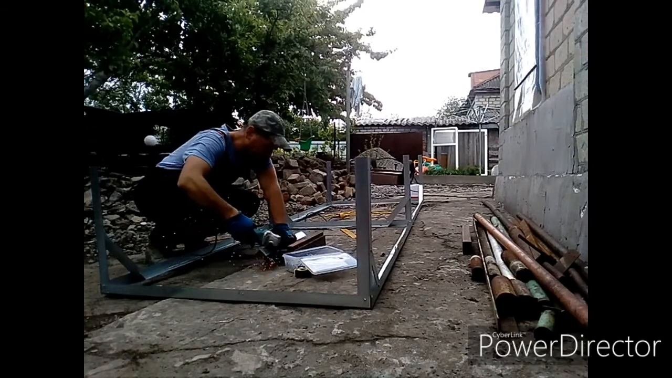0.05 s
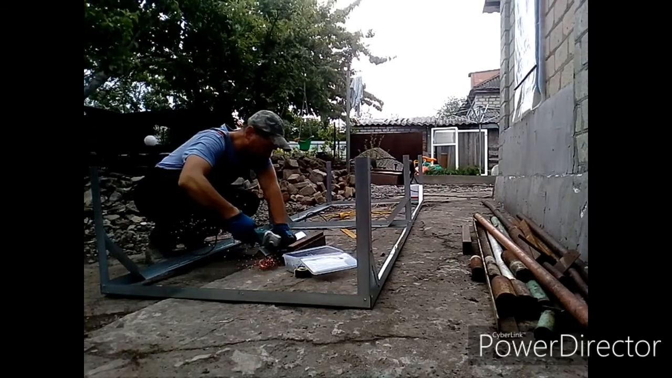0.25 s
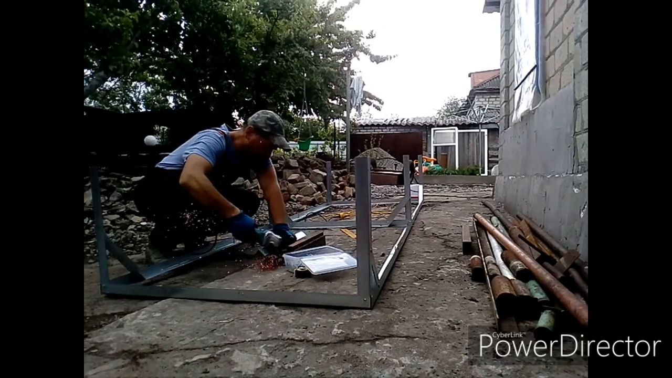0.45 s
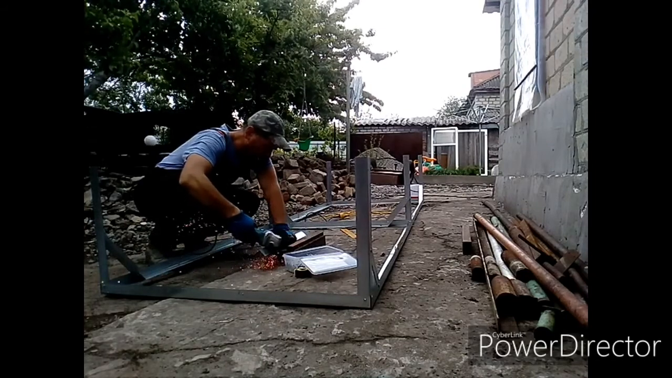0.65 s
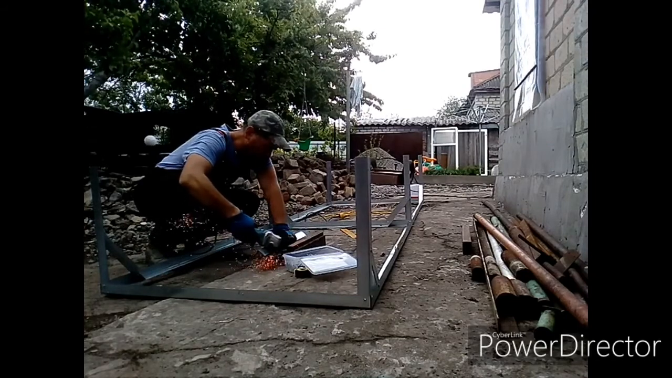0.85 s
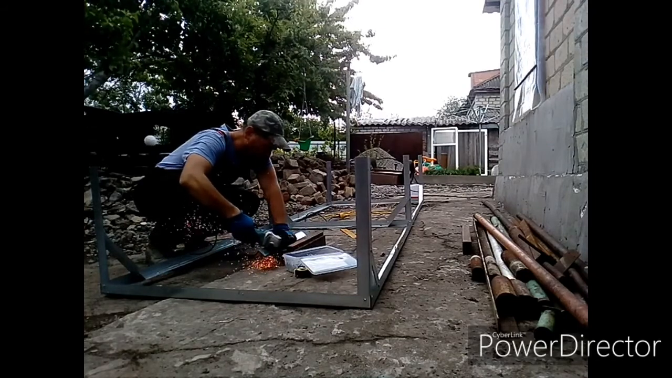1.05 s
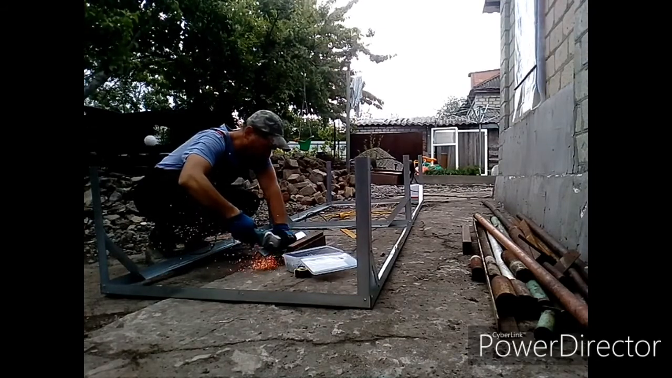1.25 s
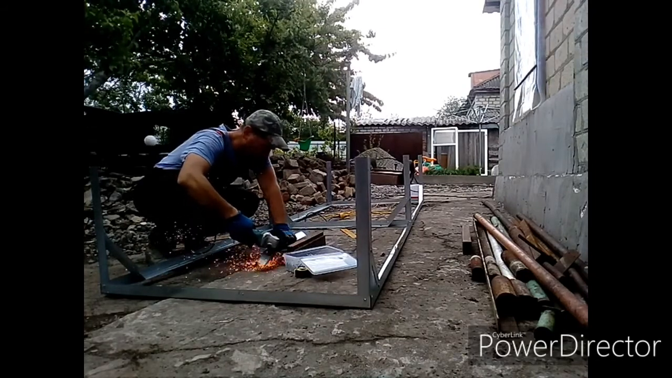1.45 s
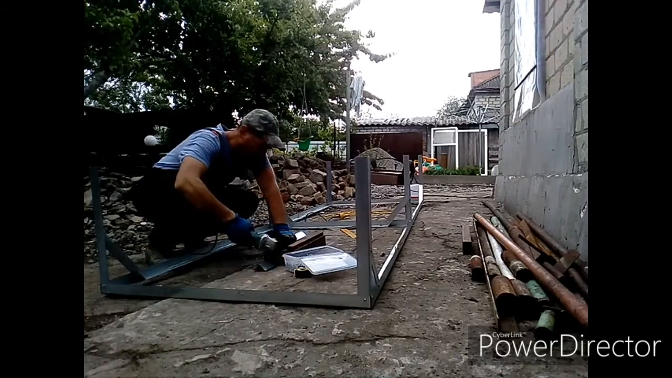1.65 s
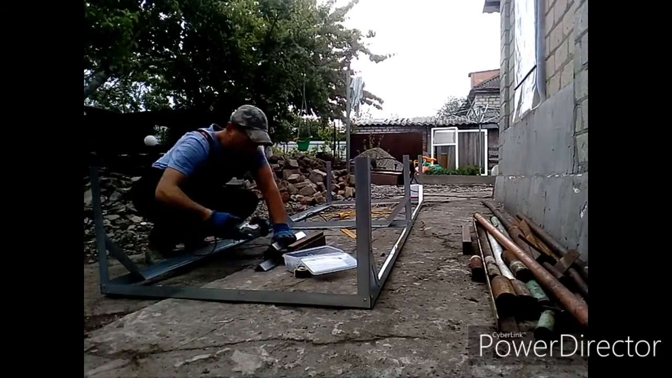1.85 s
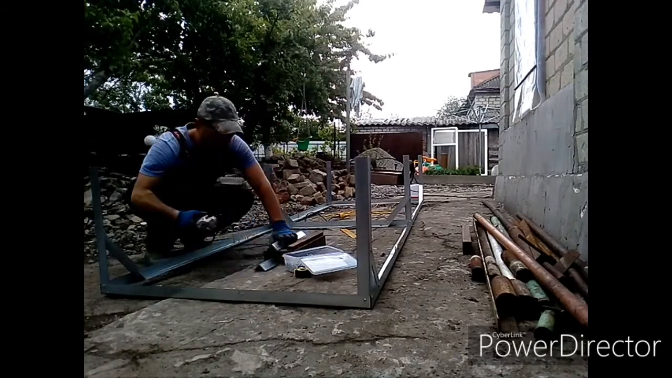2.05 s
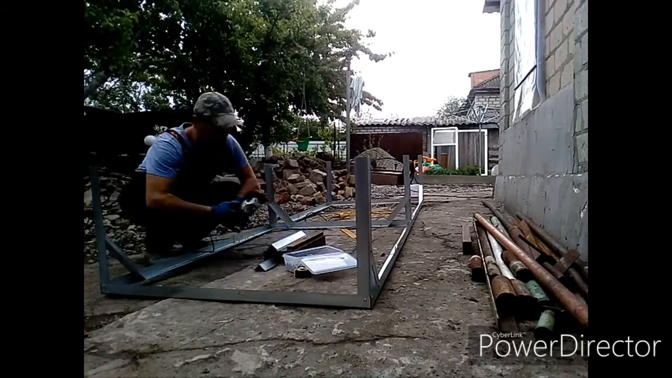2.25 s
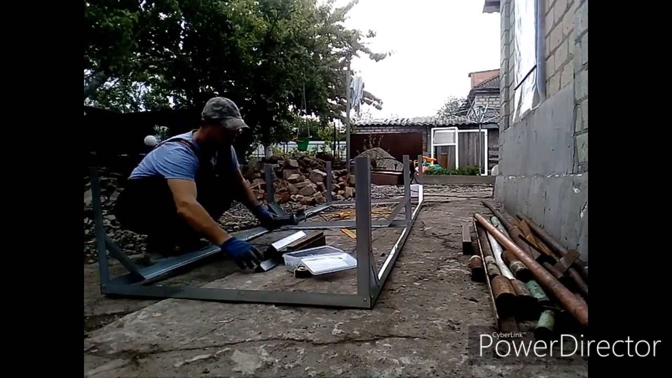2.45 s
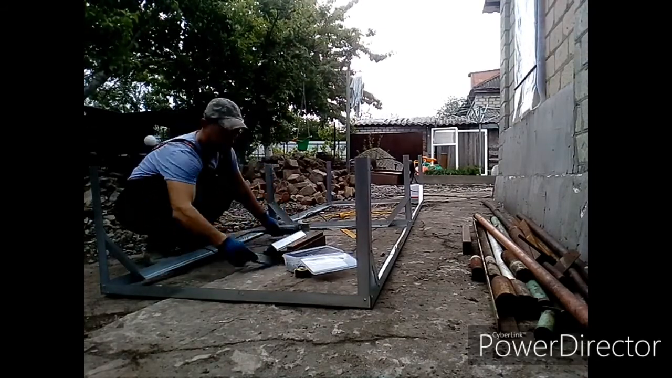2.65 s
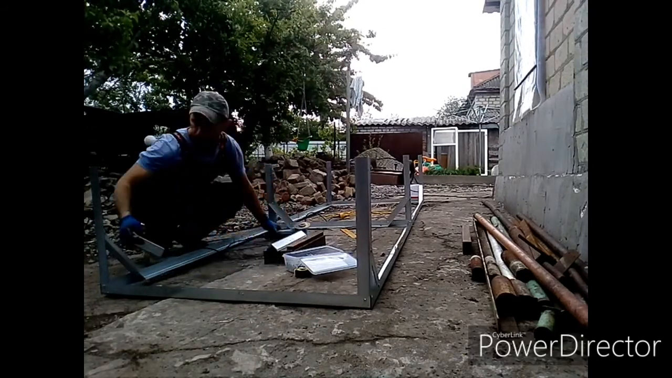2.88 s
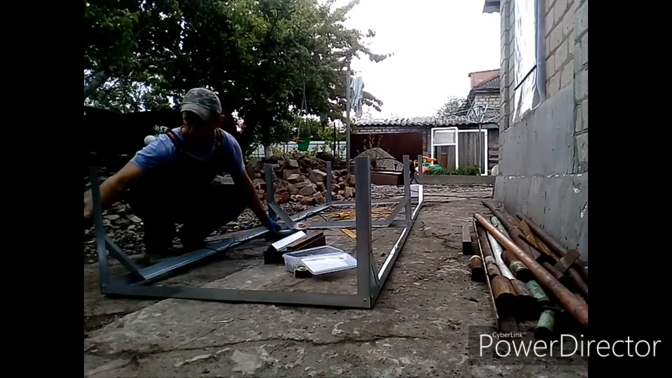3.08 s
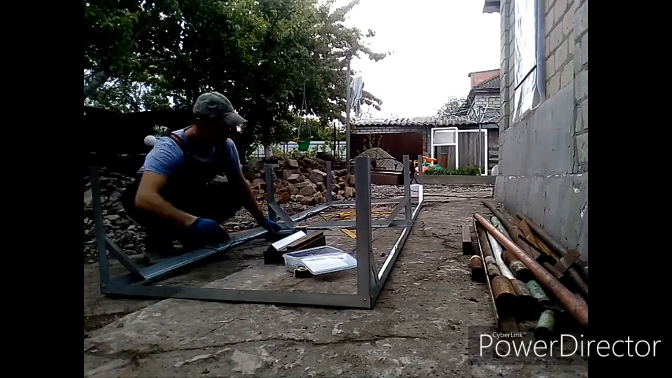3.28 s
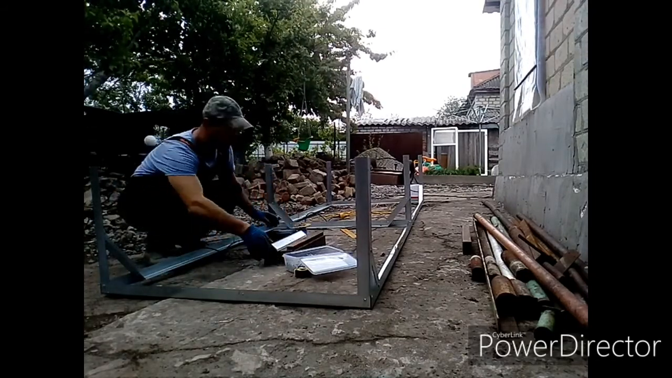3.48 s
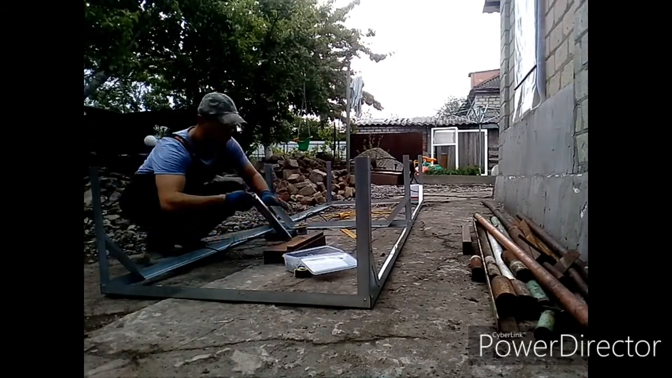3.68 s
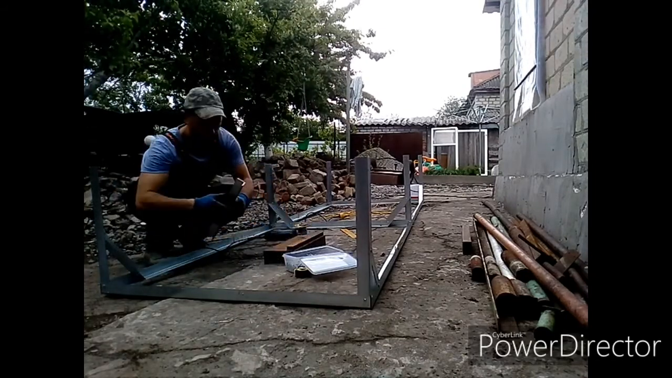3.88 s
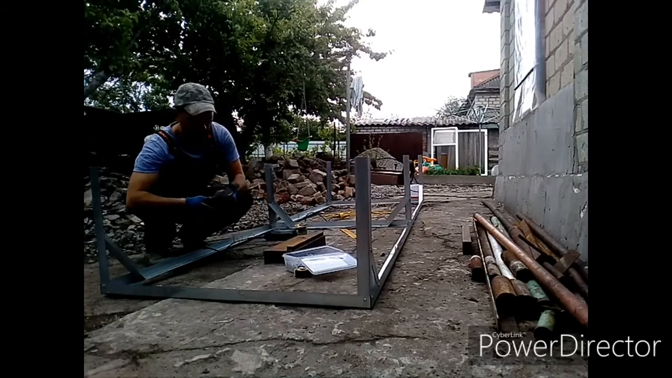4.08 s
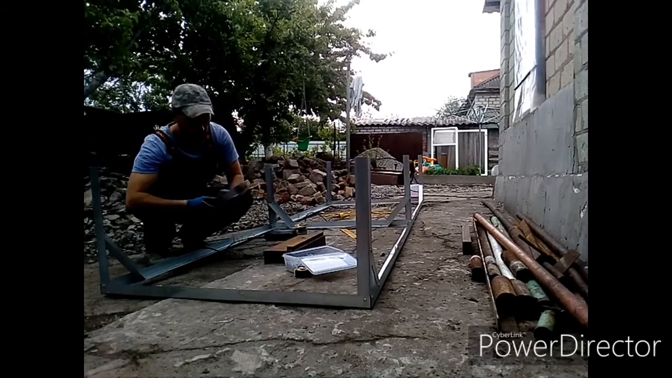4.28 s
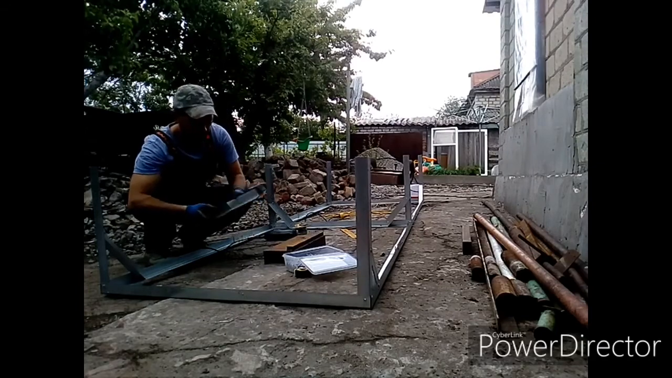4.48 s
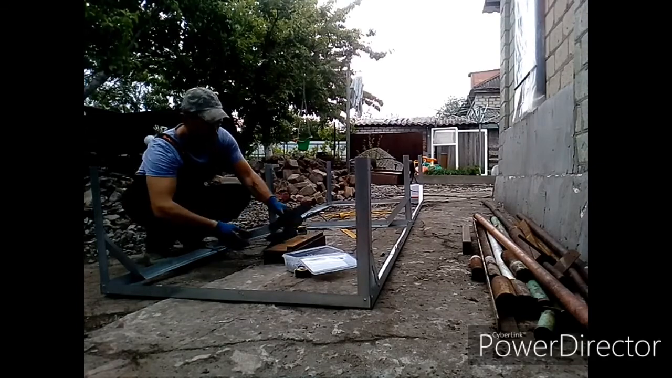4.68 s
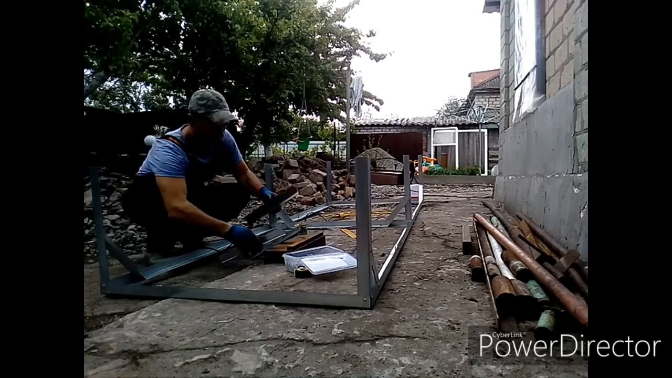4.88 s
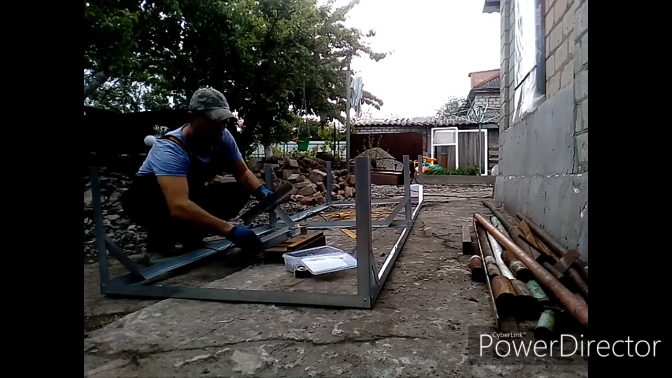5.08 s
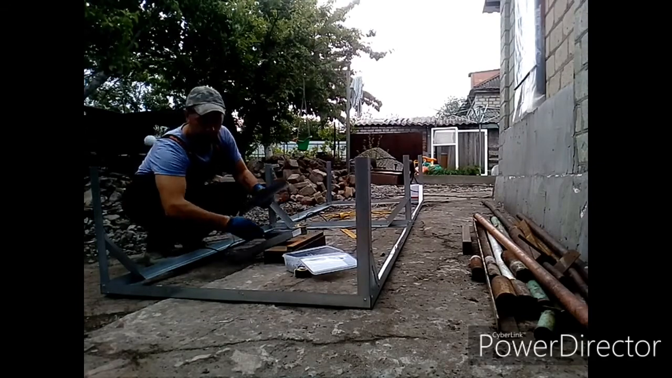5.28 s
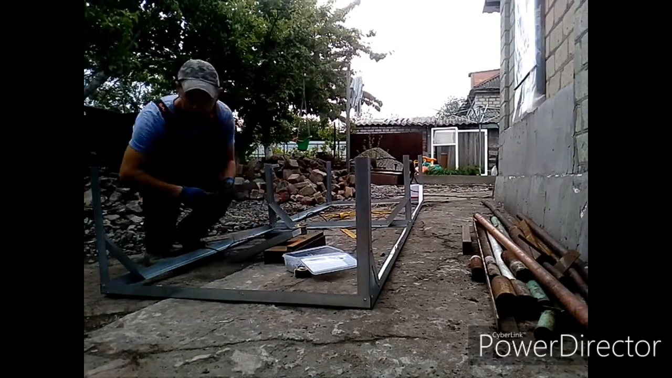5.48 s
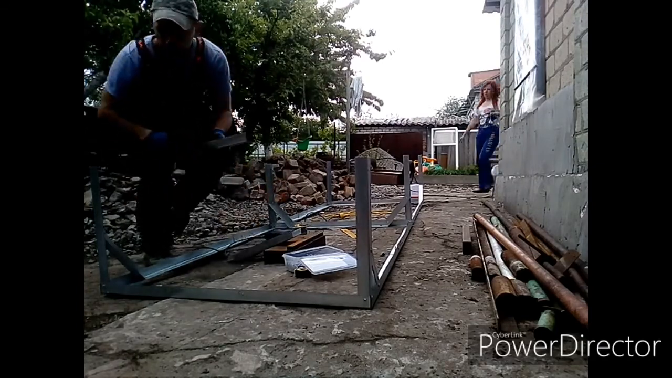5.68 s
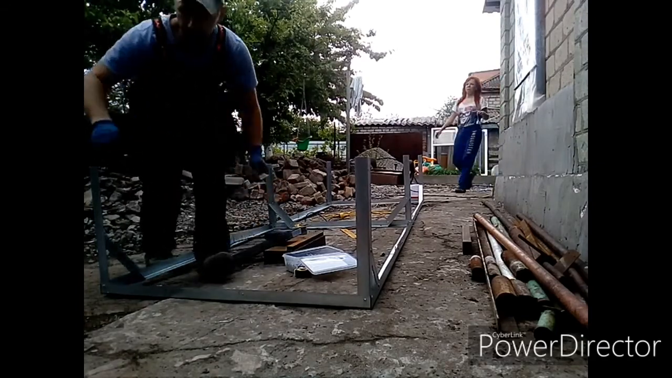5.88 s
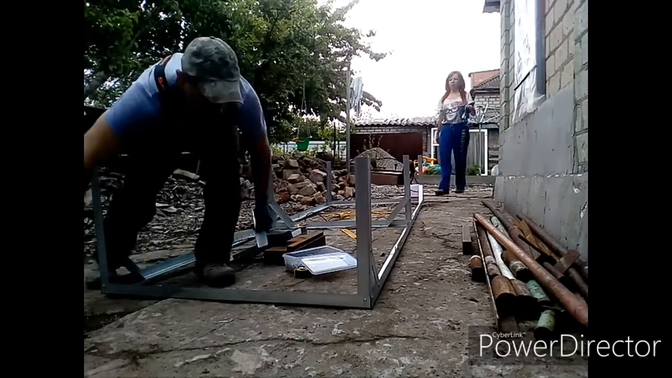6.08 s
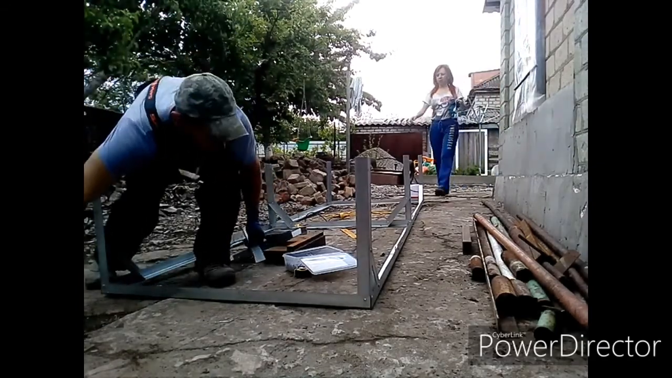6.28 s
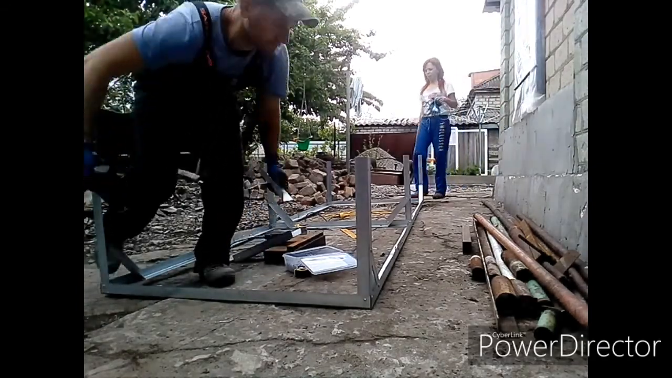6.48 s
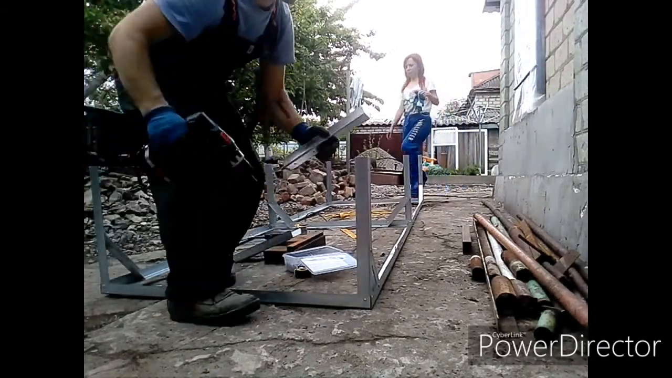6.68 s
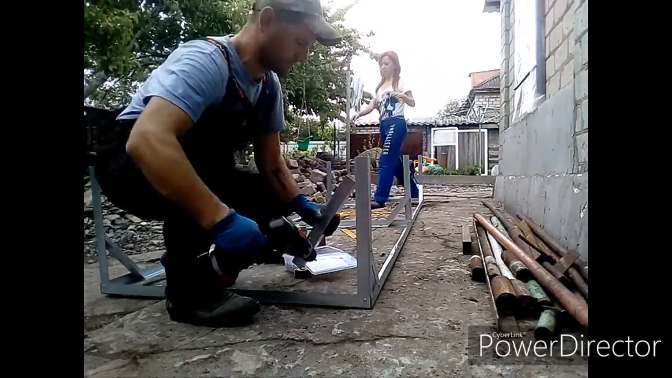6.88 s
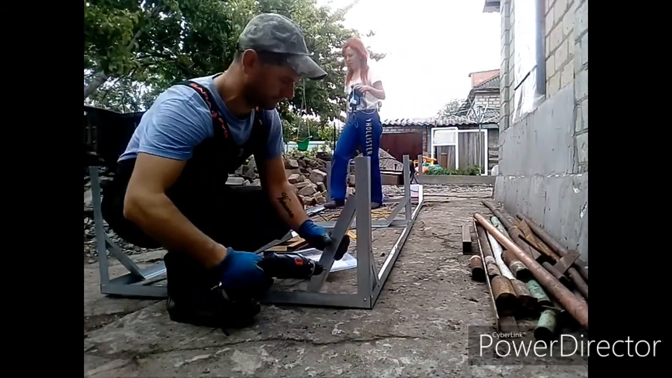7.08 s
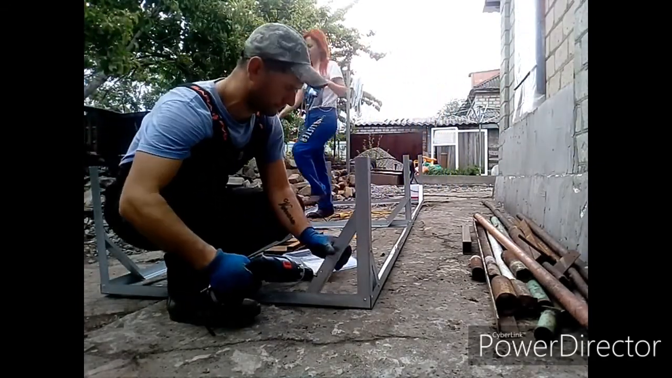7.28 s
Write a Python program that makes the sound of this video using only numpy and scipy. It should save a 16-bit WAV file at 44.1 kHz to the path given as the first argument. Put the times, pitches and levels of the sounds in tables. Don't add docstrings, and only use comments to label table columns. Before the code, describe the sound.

An angle grinder cuts steel, breaks free and races, then spins down and skids on concrete; afterwards a profile scrapes, rings, and boots scuff.

```python
import sys
import numpy as np
from scipy import signal
from scipy.fft import rfft, irfft
from scipy.io import wavfile

SR = 44100
rng = np.random.default_rng(int(sys.argv[2]) if len(sys.argv) > 2 else 0)


def store_pcm(level_fs):
    pcm = np.round(np.clip(level_fs, -1, 1) * 32767).astype(np.int16)
    wavfile.write(sys.argv[1], SR, np.atleast_2d(pcm).T)


def voltage_ratio(level):
    return 10 ** (np.asarray(level, float) / 20)


N = 323686
TIME = np.arange(N) / SR
HZ = np.arange(N // 2 + 1) * SR / N + 1e-3


def rms_one(x):
    return x / np.sqrt(np.mean(x ** 2) + 1e-20)


def column(rows, k):
    rows = np.array(rows)
    return np.interp(TIME, rows[:, 0], rows[:, k])


def at_hz(points):
    points = np.array(points)
    return np.interp(np.log(HZ), np.log(np.maximum(points[:, 0], 1)), points[:, 1])


def butter(x, order, hz, kind="low"):
    return signal.sosfilt(signal.butter(order, hz, kind, fs=SR, output="sos"), x)


def colour(x, spectrum, peaks=(), lift_db=0):
    power = 1
    for hz, width, db in peaks:
        power = power + voltage_ratio(db + lift_db) ** 2 / (1 + (2 * (HZ - hz) / width) ** 2)
    return rms_one(irfft(rfft(x) * voltage_ratio(at_hz(spectrum)) * np.sqrt(power), N))


def grit(spread_db, shape=N):
    size_db = spread_db * np.minimum(rng.standard_normal(shape), 2)
    return rng.standard_normal(shape) * voltage_ratio(size_db)


def drift(rate_hz):
    steps = rng.standard_normal(int(N / SR * 60) + 2)
    memory = np.exp(-2 * np.pi * rate_hz / 60)
    smooth = rms_one(signal.lfilter([1], [1, -memory], steps))
    return np.interp(TIME * 60, np.arange(len(steps)), smooth)


def ring(clicks, hz, t60):
    r, w = voltage_ratio(-60 / (t60 * SR)), 2 * np.pi * hz / SR
    return signal.lfilter([0, np.sin(w)], [1, -2 * r * np.cos(w), r * r], clicks + 1e-18)


def tone(hz, wobble=0):
    return np.sqrt(2) * np.sin(2 * np.pi * np.cumsum(hz) / SR + wobble)


def bursts(rows, touch_db, sag_db_per_s):
    out = np.zeros(N)
    for s, db, attack, hold, release in rows:
        at = s + np.cumsum(np.maximum([0, attack, hold, 2 * release], 1e-4))
        held = db - sag_db_per_s * max(hold, 0)
        on = slice(round(at[0] * SR), round(at[-1] * SR))
        out[on] += voltage_ratio(np.interp(TIME[on], at, [db + touch_db, db, held, held - 60]))
    return out


def rubbing(gain, spectrum, spread_db, jerk_db, peaks=()):
    contacts = colour(grit(spread_db), spectrum, peaks, lift_db=10.5)
    return butter(gain * voltage_ratio(jerk_db * drift(24.95)) * contacts, 4, 220, "high")


GEAR_RATIO = 3.71
NO_LOAD_HZ, SPIN_UP_S = 1100, .24
COAST_S, COAST_HZ = 2.0, 1025
DRAG_PER_S, FRICTION_HZ_PER_S = .6, 240
# time in seconds, motor speed in turns per second.
LOADED = [(0, 597), (.05, 613), (.17, 643), (.26, 651), (.416, 629), (.48, 646), (.52, 640), (.59, 657),
          (.7, 644), (.79, 645), (1.06, 671), (1.11, 667), (1.31, 679), (1.49, 700), (1.55, 716)]


def speed():
    free_s, free_hz = LOADED[-1]
    racing = NO_LOAD_HZ - (NO_LOAD_HZ - free_hz) * np.exp(-np.maximum(TIME - free_s, 0) / SPIN_UP_S)
    powered = np.where(TIME < free_s, column(LOADED, 1), racing)
    rest = FRICTION_HZ_PER_S / DRAG_PER_S
    coasting = (COAST_HZ + rest) * np.exp(-DRAG_PER_S * (TIME - COAST_S)) - rest
    return np.maximum(np.minimum(powered, coasting), 20)


def by_speed(db, db_per_octave):
    stopped_s = 3.66
    stopping_db = 75 * np.maximum(TIME - stopped_s, 0)
    return voltage_ratio(db + db_per_octave * np.log2(speed() / COAST_HZ) - stopping_db)


THROUGH_S, THROUGH_FALL_S = 1.568, 0.073
# frequency in Hz, level in dB per Hz.
GRIND = [(180, -54), (300, -34.5), (574, -33.5), (645, -35), (801, -24.5), (1580, -10), (2500, -5.5),
         (3300, -6), (3900, -6.5), (4300, -6.5), (5160, -7), (5800, -2), (6960, -2), (12700, -2),
         (15500, -11), (16400, -41.5)]
# frequency in Hz, width in Hz, level in dB.
GRIND_PEAKS = [(4517, 210, 9.5), (5800, 300, 7), (7330, 89, -2), (7960, 1000, -0.5), (8910, 290, 1.5),
               (10080, 150, 8.5), (11290, 300, 5.5), (12570, 220, 3.5)]


def cutting():
    turns = np.cumsum(speed() / GEAR_RATIO) / SR
    fresh = grit(3.6, shape=(int(turns[2 * SR]) + 2, 256))
    rim = signal.lfilter([1], [1, -.86], fresh, axis=0)
    rim = signal.resample_poly(rim.ravel(), 4, 1)
    rim = rms_one(np.interp(turns * 1024, np.arange(len(rim)), rim, right=0)[:2 * SR])
    sparks = butter(grit(10.87), 2, 6500, "high")
    judder = butter(grit(2.9), 2, 1400)
    rub = np.pad(rim, (0, N - 2 * SR)) + (voltage_ratio(-9) * sparks + voltage_ratio(-2) * judder) * (TIME < 2)
    rub = rub * (1 + 0.31 * np.cos(2 * np.pi * turns))
    pressed = bursts([(0, -18, 0.00795, THROUGH_S, THROUGH_FALL_S)], touch_db=0, sag_db_per_s=0.33)
    cut = colour(rub, GRIND, GRIND_PEAKS) * np.sqrt(2 * SR / N)
    return cut * pressed * voltage_ratio(0.45 * drift(5.3))


# multiple of disc speed, level in dB at the guard resonance.
DISC_ORDERS = [(4, -52), (5, -50), (6, -57)]
# frequency in Hz, width in Hz.
GUARD = (1120, 300)
# time in seconds, level in dB.
TONE_SHADE = [(2.45, 0), (2.62, -6), (2.85, -6), (3.05, 1), (3.19, 2), (3.23, -8)]


def motor():
    hz = speed()
    powered_db = -0.5 * (TIME < 1.9)
    release_db = np.interp(TIME, [1.5, 1.6, 1.75, 1.9], [-3.0, -16, -2.5, 2.0])
    unsteady_db = 2.5 * drift(21) - 2.0
    tone_gain = by_speed(-49, 8) * voltage_ratio(powered_db + release_db + column(TONE_SHADE, 1) + unsteady_db)
    out = tone_gain * tone(hz, 0.32 * drift(20.2))
    free = np.interp(TIME, [1.6, 2.0, 2.3, 2.42], [.2, 1, 1, 0])
    for k, db in DISC_ORDERS:
        order_hz = k * hz / GEAR_RATIO
        guard = 1 + (2 * (order_hz - GUARD[0]) / GUARD[1]) ** 2
        out += free * voltage_ratio(db + 2.5 * drift(8)) * tone(order_hz) / guard
    wobble = np.interp(TIME, [1.6, 1.8, 2.0, 2.2], [0.091, 0.83, .8, 0.052]) * voltage_ratio(-60 + 3 * drift(12))
    out += wobble * tone(hz / GEAR_RATIO, .5 * drift(15))
    whine_hz = 31.0 * np.interp(TIME, [2.76, 2.95], [500, 410])
    whine_gain = voltage_ratio(-49) * np.interp(TIME, [2.76, 2.79, 2.88, 2.96], [0, 1, 1, 0])
    return out + whine_gain * tone(whine_hz, .4 * drift(25))


# frequency in Hz, level in dB per Hz.
AIR = [(1470, -26), (2500, -12), (5970, 0), (7420, -1), (8460, 3), (13000, 2), (14600, -9.5),
       (15500, -17.5), (16400, -51.5)]
# frequency in Hz, level in dB per Hz.
RATTLE = [
    [(240, -52.5), (400, -33.5), (762, -18.5), (991, -8), (1450, -13.5), (1910, -0.5), (2670, -7), (3500, -3.5), (4550, -34), (7700, -120)],
    [(240, -31), (400, -19.5), (873, -16), (1390, -1.5), (1710, -6.5), (2280, 0), (2740, -7.5), (3500, -6), (4550, -27), (7700, -120)],
]
# frequency in Hz, width in Hz, level in dB.
HOUSING = [(1220, 90, 6), (1420, 150, 2), (8720, 90, 12), (12400, 200, 3), (10400, 300, -2)]
# time in seconds, level in dB.
FACING = [(2.28, -0.33), (2.5, -6), (2.72, -6), (3.15, -1.1)]
# start in seconds, level in dB, then attack, hold
# and 30 dB release, all in seconds.
BRUSHES = [
    (1.6, -28.5, 0.0041, 0.0059, 0.15),
    (1.634, -30, 0.015, 0.05, 0.12),
    (1.735, -47.5, 0.0081, 0.022, -0.3),
]


def free_running():
    slow = np.clip((800 - speed()) / 260, 0, 1)
    fast_share, slow_share = np.sqrt(1 - slow), np.sqrt(slow)
    air = fast_share * colour(grit(1.9), AIR, [(8200, 520, -0.74), (10570, 300, 0.43)])
    air = air + slow_share * colour(grit(3.6), AIR, HOUSING, lift_db=-1.5)
    rattle = fast_share * colour(grit(4.1), RATTLE[0], HOUSING[:1])
    rattle = rattle + slow_share * colour(grit(1.9), RATTLE[1], HOUSING[1:2])
    through = np.clip((TIME - THROUGH_S) / THROUGH_FALL_S, 0, 1)
    blowing = through * by_speed(-25, 8.5) * voltage_ratio(column(FACING, 1))
    blowing = blowing + bursts(BRUSHES, touch_db=6.5, sag_db_per_s=39)
    switch_off_s = 1.97
    mesh_db = 2 * np.clip((switch_off_s - TIME) / 0.031, -1, 1)
    rattling = through * by_speed(-37.5, 6.5) * voltage_ratio(mesh_db + drift(5.1))
    return blowing * air * voltage_ratio(drift(17.4)) + rattling * rattle


# start in seconds, level in dB, then attack, hold
# and 30 dB release, all in seconds.
SKID = [
    (3.1855, -19, .001, .016, .01),
    (3.208, -15, .01, .004, .05),
    (3.236, -22, .006, .02, .04),
    (3.272, -22, .012, .022, .025),
    (3.305, -30, .01, .03, .09),
]
# frequency in Hz, level in dB per Hz.
CONCRETE = [(290, -59), (500, -34.5), (1110, -26.5), (1230, -23.5), (1980, -24), (2540, -22), (3810, -15.5),
            (4340, -7.5), (6420, -8), (7860, 0.5), (14700, -11), (15500, -12.5), (16400, -42.5)]
# frequency in Hz, width in Hz, level in dB.
DISC_RING = [(1910, 180, -1.5), (4320, 54, -4), (5170, 110, -7), (7050, 160, -0.5), (7850, 190, -5),
             (8240, 81, -18), (10900, 210, -4), (12600, 330, -3)]


def disc_skid():
    gain = bursts(SKID, touch_db=-4, sag_db_per_s=57.5)
    return rubbing(gain, CONCRETE, spread_db=3.0, jerk_db=0.7, peaks=DISC_RING)


# start in seconds, level in dB, then attack, hold
# and 30 dB release, all in seconds.
DRAG = [(4.780, -29, 0.0037, 0.0132, 0.1), (4.793, -29.5, .004, 0.029, 0.22),
        (4.833, -25, 0.0626, 0.031, 0.12), (4.983, -30.5, 0.056, .02, 0.02),
        (5.075, -22.5, .004, 0.022, 0.0165), (5.113, -31, .005, .02, 0.0547),
        (5.136, -23.5, 0.003, 0.022, 0.04), (5.161, -21, 0.016, 0.049, 0.09),
        (5.225, -24, 0.017, 0.048, 0.1148), (5.332, -22.5, 0.0044, 0.031, 0.0072),
        (5.344, -24, 0.024, 0.036, 0.0659), (5.42, -31.5, 0.011, 0.016, 0.1)]
# frequency in Hz, level in dB per Hz.
DRAG_COLOUR = [(240, -20.5), (400, -28), (850, -20), (1200, -13.5), (2300, -12.5), (2550, -13.5),
               (2700, -18), (3000, -11.5), (5400, -7.5), (6500, -3.5), (8000, -4.5), (13500, -9),
               (15500, -17), (16400, -42)]
# frequency in Hz, width in Hz, level in dB.
DRAG_PEAKS = [(1214, 30, 1.5), (1570, 64, -4), (2907, 99, -0.5), (3365, 43, -1.5), (4670, 50, -1),
              (6120, 120, -1), (6900, 34, 2.5), (7000, 51, -3), (7510, 49, -1), (7910, 45, 0.5),
              (9100, 180, -9), (10380, 110, -0.5), (11250, 70, -0.5), (11900, 60, -7)]
# frequency in Hz, level in dB, time to fall 60 dB in seconds.
PROFILE = [(1100, -67, .3), (2342, -52, .7), (3305, -55, .3), (3871, -68, .9), (4511, -52, .2),
           (5238, -58, .4), (6772, -47, .13), (6993, -52, .13), (7203, -50, .12), (8716, -58, .4),
           (9771, -61, .6), (9938, -54, .22), (10910, -65, .8), (12240, -61, .4)]
# time in seconds, level in dB.
LIFT_OFF = [
    (5.42, 6.5),
    (5.437, -9),
]


def profile():
    at = [round(s * SR) for s, db in LIFT_OFF]
    blow_db = np.array(LIFT_OFF)[:, 1]
    out = np.zeros(N)
    for hz, db, t60 in PROFILE:
        blows = np.zeros(N)
        blows[at] = voltage_ratio(db + blow_db + rng.standard_normal(len(at)))
        out += ring(blows, hz, t60)
    for stroke in DRAG:
        peaks = np.array(DRAG_PEAKS) + rng.standard_normal((len(DRAG_PEAKS), 3)) * [15, 0, 3.0]
        gain = bursts([stroke], touch_db=-2, sag_db_per_s=44.5)
        out += rubbing(gain, DRAG_COLOUR, spread_db=6.5, jerk_db=0.45, peaks=peaks)
    return out


# start in seconds, level in dB, then attack, hold
# and 30 dB release, all in seconds.
WIPES = [
    (3.69, -29.5, 0.065, 0.019, 0.09),
    (4.036, -42.5, 0.036, 0.059, -0.15),
    (4.374, -55, 0.003, 0.0026, 0.05),
    (4.472, -34.5, 0.031, 0.031, 0.08),
]
# frequency in Hz, level in dB per Hz.
GLOVE = [(410, -43), (700, -28), (1260, -16), (1560, -21.5), (2240, -17.5), (2490, -19), (3460, -10.5),
         (7790, -5), (13000, -9), (15500, -22), (16400, -38)]


def glove():
    gain = bursts(WIPES, touch_db=-22.5, sag_db_per_s=104.0)
    return rubbing(gain, GLOVE, spread_db=2.0, jerk_db=-2.5)


# time in seconds, peak level in dB.
TICKS = [(1.623, -13), (1.631, -12), (1.7264, -13), (1.787, -14), (1.8405, -16), (1.959, -16),
         (2.9904, -33), (3.1862, -11), (3.2087, -13), (4.3235, -42), (4.3768, -42), (4.3795, -44),
         (4.781, -24), (4.8037, -21), (4.994, -26), (5.0766, -22), (5.078, -9), (5.0812, -16),
         (5.0925, -15), (5.136, -12), (5.175, -16), (5.3365, -21), (5.343, -19), (5.4335, -21),
         (5.7344, -46), (6.3815, -37), (6.766, -32), (6.769, -34), (7.2575, -34)]


def ticks():
    out, puff = np.zeros(N), np.arange(900) / SR
    for s, db in TICKS:
        at = round(s * SR)
        burst = rng.standard_normal(900) * voltage_ratio(-60 * puff / .009)
        burst = burst + .25 * ring(burst, rng.uniform(4200, 4700), .012)
        burst = butter(burst, 3, [2000, 15000], "band")
        out[at:at + 900] += voltage_ratio(db) * burst / np.abs(burst).max()
    return out


# time in seconds, peak level in dB, body pitch in Hz,
# time to fall 60 dB in seconds, thud level in dB.
KNOCKS = [(2.792, -42, 1250, 0.015, -37.5), (3.01, -54, 1410, 0.02, -54), (3.631, -42.5, 1090, 0.009, -50),
          (5.736, -43.5, 1050, 0.014, -47), (5.979, -37, 1045, 0.016, -41),
          (6.009, -44, 520, 0.0097, -51.5), (6.059, -55, 1040, 0.02, -53), (6.162, -30, 1004, 0.009, -47),
          (6.385, -41, 925, 0.039, -50), (6.557, -55, 1220, 0.019, -62.5), (6.629, -47, 587, 0.017, -51.5),
          (6.766, -39.5, 686, 0.018, -39), (6.961, -49, 496, 0.027, -74)]


def knocks():
    out, age = np.zeros(N), np.arange(6000) / SR
    for s, db, hz, t60, thud_db in KNOCKS:
        at, contact = round((s + .002) * SR), np.zeros(6000)
        contact[:120] = np.hanning(120) * np.sin(2 * np.pi * hz * age[:120])
        body = ring(contact, hz, t60) + 1.4 * ring(contact, 1.53 * hz, t60)
        body = body + 0.31 * ring(contact, 0.89 * hz, t60) + 0.56 * ring(contact, .5 * hz, 1.7 * t60)
        crunch = butter(rng.standard_normal(6000), 2, [500, 3000], "band") * voltage_ratio(-60 * age / 0.06)
        body = body / np.abs(body).max() + 0.24 * crunch
        push = np.diff(np.hanning(150), prepend=0, append=np.zeros(5850))
        thud = ring(push, 249, 0.068) + .5 * ring(push, 356, 0.088) + 0.16 * ring(push, 173, 0.069)
        knock = voltage_ratio(db) * body / np.abs(body).max() + voltage_ratio(thud_db) * thud / np.abs(thud).max()
        out[at:at + 6000] += knock
    return out


# frequency in Hz, level in dB per Hz.
SOLE = [(180, -26), (300, -15.5), (372, -15), (593, -12), (856, -18), (1060, -10), (2570, -14),
        (5080, -16.5), (12900, -14), (15500, -37), (16400, -52.5)]
# start in seconds, level in dB, then attack, hold
# and 30 dB release, all in seconds.
SCUFFS = [
    (5.72, -62.5, 0.0081, 0.038, 0),
    (5.9, -62.5, 0.035, 0.0019, -0.4),
    (5.962, -59.5, 0.023, .002, -0.16),
    (6.3, -61, 0.043, 0.018, -2.3),
    (6.381, -53.5, 0.0011, 0.003, 0.16),
    (6.55, -64.5, 0.016, 0.0024, 1.5),
    (6.64, -64, 0.053, 0.1, -0.6),
    (7.09, -62.5, 0.033, 0.092, 0.5),
    (7.253, -42, 0.0022, 0.051, -0.9),
    (7.308, -36, 0.021, 0.0092, -3),
]


def scuffs():
    gain = bursts(SCUFFS, touch_db=-12, sag_db_per_s=42.5)
    return rubbing(gain, SOLE, spread_db=-3.0, jerk_db=2.5)


# start in seconds, level in dB, then attack, hold
# and 30 dB release, all in seconds.
SLIDE = [
    (6.776, -45, 0.0091, 0.061, 0.21),
]
# frequency in Hz, width in Hz, level in dB.
OFFCUT = [(970, 194, -3.5), (1910, 150, -7), (3800, 200, -5), (5230, 240, -1), (7800, 200, -1.5),
          (12500, 400, -6)]


def offcut():
    gain = bursts(SLIDE, touch_db=-3.5, sag_db_per_s=64)
    return rubbing(gain, SOLE, spread_db=4.5, jerk_db=3.0, peaks=OFFCUT)


# time in seconds, hum level in dB.
HUM = [(0, -61), (1.3, -67.5), (1.65, -59.5), (2.1, -58), (2.9, -64), (3.5, -60), (4.1, -64), (4.5, -55.5),
       (5.3, -53), (6.0, -51.5), (7.34, -51)]
# frequency in Hz, level in dB per Hz.
FLOOR = [(15, -53.5), (25, -21), (70, -28), (95, -16), (236, -13.5), (354, -16.5), (607, -20.5),
         (1230, -22), (2280, -28.5), (6000, -33.5), (13200, -33), (15500, -37), (16400, -57.5)]


def yard():
    hz = np.full(N, 296.7)
    hum = voltage_ratio(column(HUM, 1) + 1.2 * drift(9.7)) * (tone(hz) + voltage_ratio(-19.0) * tone(2 * hz))
    shared, left, right = (colour(rng.standard_normal(N), FLOOR) for _ in range(3))
    sides = np.array([left, right])
    low = butter(shared + 0.5 * sides, 2, 700)
    high = butter(sides, 2, 700, "high")
    return np.array([[1], [.8]]) * hum + voltage_ratio(-64 + 1.5 * drift(3.7) + 6.5) * (low + high)


# time in seconds, pitch in Hz, level in dB.
TRAFFIC = [
    (3.3, 98.2, -91.5),
    (3.6, 100.4, -71),
    (4.3, 105, -78),
    (4.55, 84.25, -68.5),
    (5.3, 101.3, -65),
    (5.55, 119.1, -75),
    (5.8, 141.7, -64.5),
    (6.3, 113.9, -70),
    (7.34, 113.8, -71),
]


def traffic():
    gain = voltage_ratio(column(TRAFFIC, 2)) * (TIME >= TRAFFIC[0][0])
    return gain * voltage_ratio(2 * drift(6.3)) * tone(column(TRAFFIC, 1))


def wind():
    shared, left, right = rng.standard_normal((3, N))
    gust = butter(shared + .4 * np.array([left, right]), 2, [15, 70], "band")
    return voltage_ratio(-67.5 - 9 * TIME + 3 * drift(4)) * rms_one(gust)


# frequency in Hz, level in dB.
WET = [(100, -14), (500, -7), (1200, -4), (2000, 2), (3100, 4), (4500, -1), (6000, -1), (8000, 1.5),
       (14000, 4)]
# frequency in Hz, left minus right in dB.
PORT_BALANCE = [(60, 1), (110, -1), (200, -4.5), (380, 11.5), (700, -2.5), (1290, -5), (2380, -1),
                (4400, 1.5), (8120, 7), (15000, -3)]
# frequency in Hz, lag in radians.
PORT_PHASE = [(0, 0), (1000, .6), (1700, .8), (2350, 2.3), (2700, 3.1), (3200, 4.3), (4500, 6.6),
              (5900, 7.8), (7200, 8.2), (8600, 9.6), (10000, 10.5), (11400, 10), (13000, 12.5), (16000, 15)]


def heard(x, pan_db, t60=0.035):
    size, steady = 8192, 0.42
    out, state = np.zeros((2, N + 3 * size)), 0
    hz, age = np.arange(size + 1) * SR / (2 * size), np.arange(size) / SR
    side = np.array([[.5], [-.5]])
    wet = voltage_ratio(np.interp(hz, HZ, at_hz(WET)))
    balance_db = np.interp(hz, HZ, at_hz(PORT_BALANCE)) + pan_db
    ports = voltage_ratio(side * balance_db) / np.sqrt(1 + wet ** 2)
    direct = np.exp(-1j * side * np.interp(hz, *np.transpose(PORT_PHASE)))
    fading = voltage_ratio(-60 * age / t60) * (age > .002)
    fading = fading * np.sqrt((1 - steady ** 2) / np.sum(fading ** 2))
    x, window = np.pad(x, (size // 2, size)), signal.get_window("hann", size)
    for i in range(0, N + size // 2, size // 2):
        state = steady * state + rng.standard_normal((2, size)) * fading
        path = ports * (direct + wet * rfft(state, 2 * size))
        out[:, i:i + 2 * size] += irfft(rfft(x[i:i + size] * window, 2 * size) * path)
    return voltage_ratio(3.0) * out[:, size // 2:size // 2 + N]


def scene():
    grinder = cutting() + motor() + free_running() + disc_skid()
    hands = glove() + profile()
    sharp = ticks()
    feet = scuffs() + knocks() + offcut() + voltage_ratio(-9) * sharp
    early = TIME < 5.6
    work = heard(grinder + hands + early * feet, pan_db=-0.22)
    work = work + heard(~early * feet, pan_db=-1.0, t60=0.064)
    direct_ticks = voltage_ratio(2) * np.array([np.roll(sharp, 9), 0.44 * sharp])
    return work + direct_ticks + yard() + traffic() + wind()


def roll_off(x):
    return signal.sosfilt(signal.butter(12, 15480, fs=SR, output="sos"), x)


def record(dry):
    lift = butter(dry, 2, [13800, 15400], "band")
    rounded = 0.78 * np.tanh((dry + 0.19 * lift) / 0.82)
    top = signal.cheby2(14, 60, 16800, fs=SR, output="sos")
    mix = signal.sosfilt(top, rounded)
    return roll_off(mix)


dry = scene()
out = record(dry)
store_pcm(out)
```